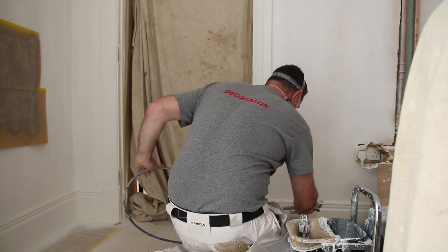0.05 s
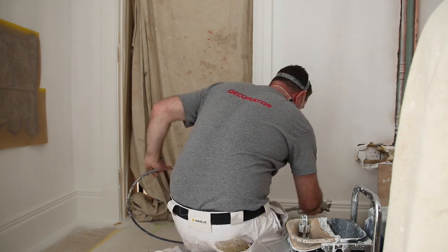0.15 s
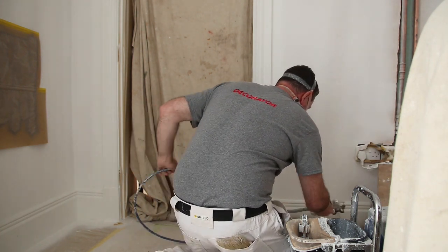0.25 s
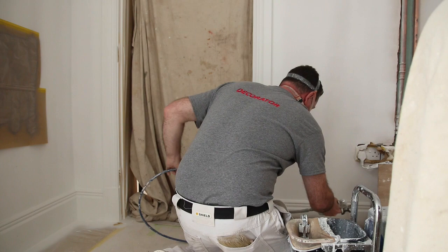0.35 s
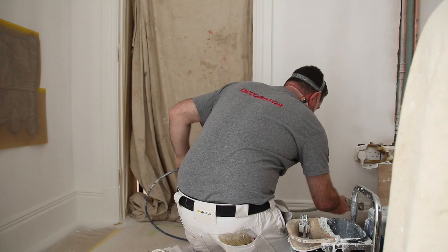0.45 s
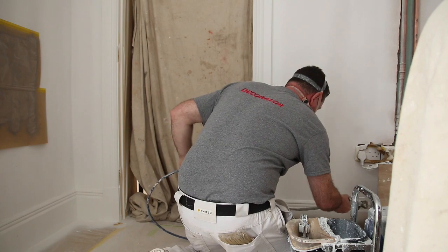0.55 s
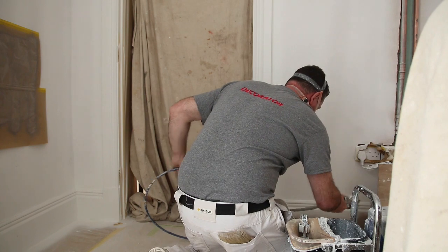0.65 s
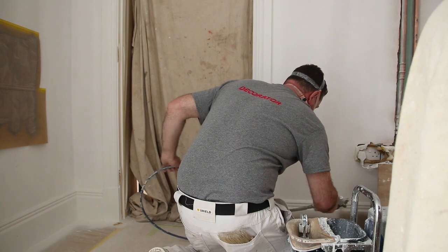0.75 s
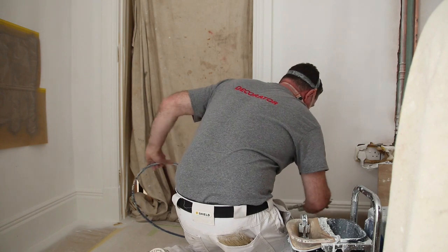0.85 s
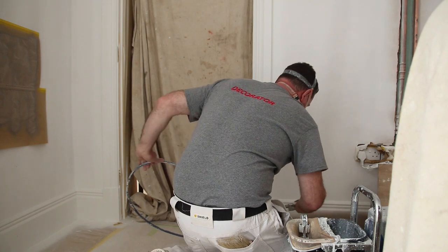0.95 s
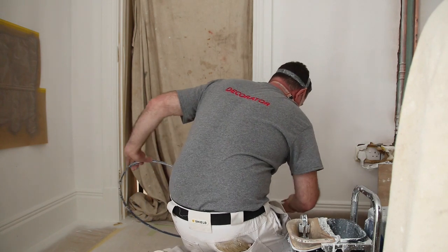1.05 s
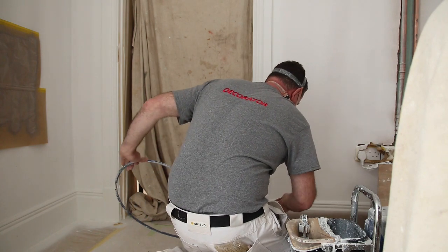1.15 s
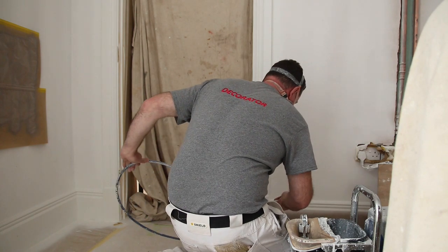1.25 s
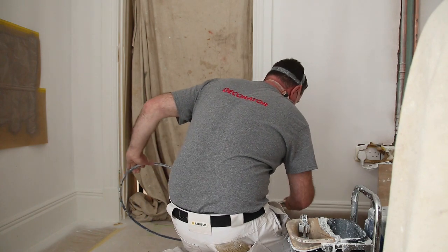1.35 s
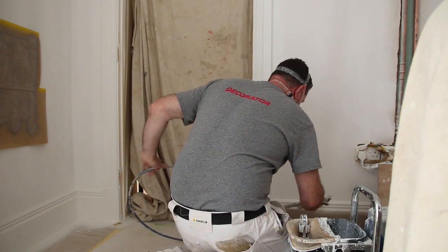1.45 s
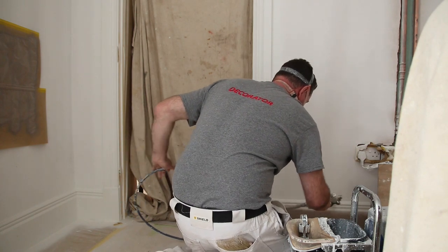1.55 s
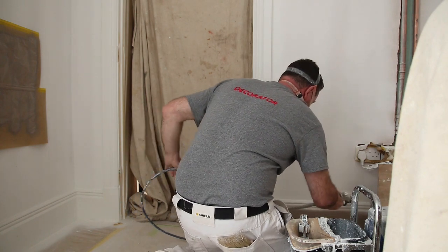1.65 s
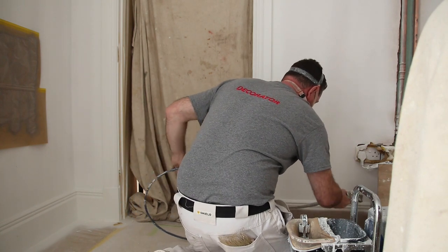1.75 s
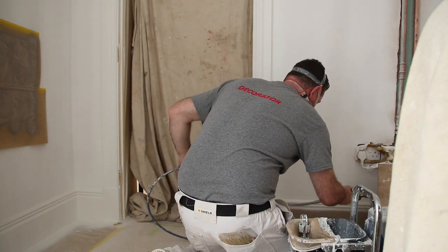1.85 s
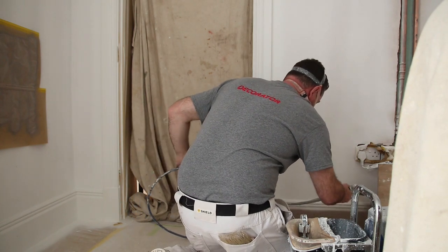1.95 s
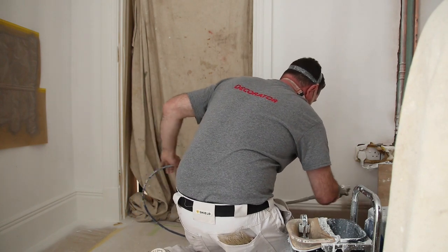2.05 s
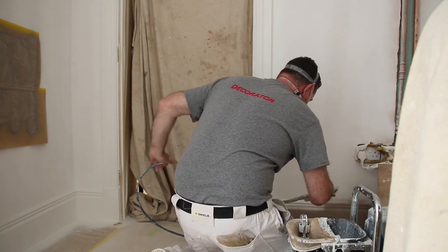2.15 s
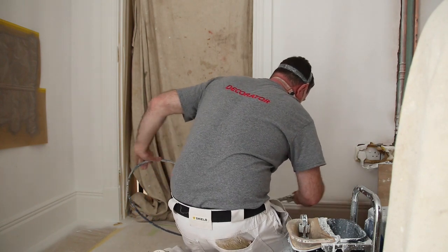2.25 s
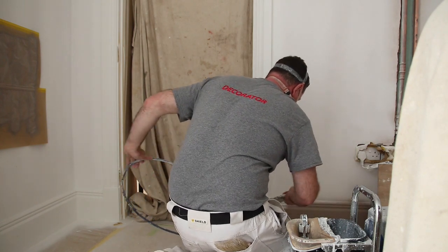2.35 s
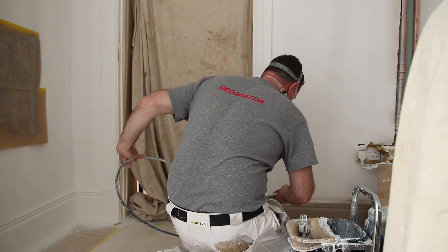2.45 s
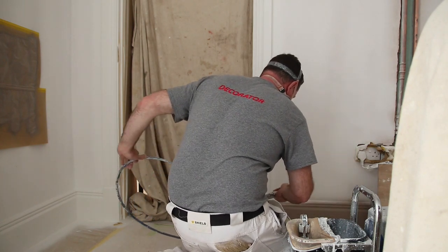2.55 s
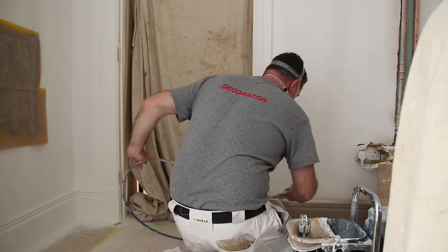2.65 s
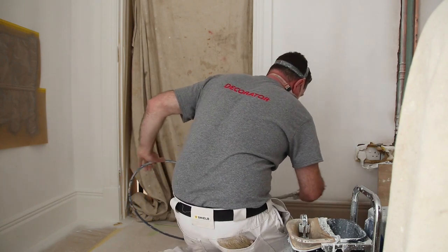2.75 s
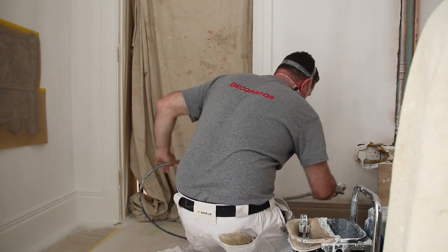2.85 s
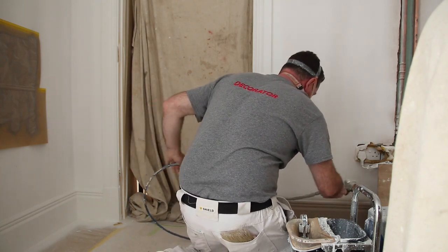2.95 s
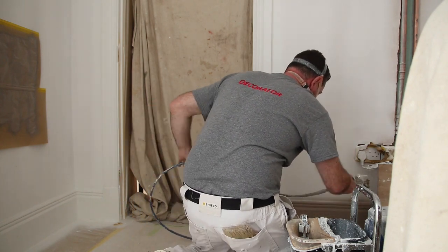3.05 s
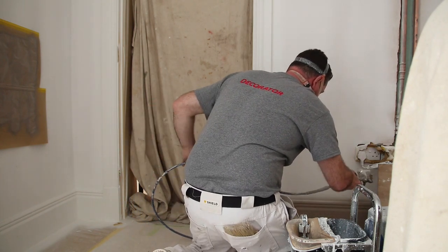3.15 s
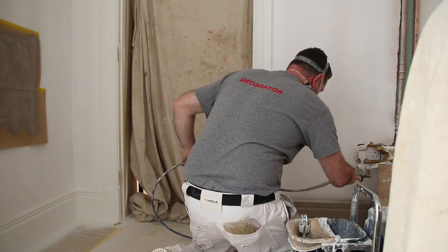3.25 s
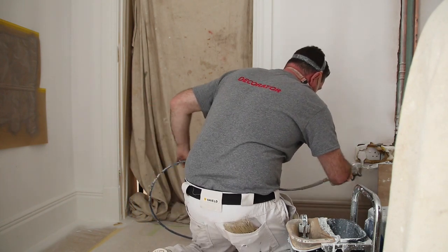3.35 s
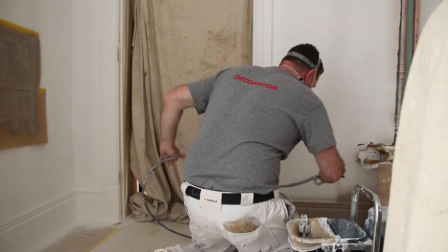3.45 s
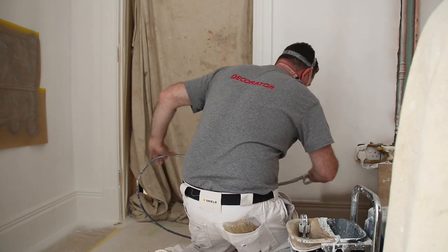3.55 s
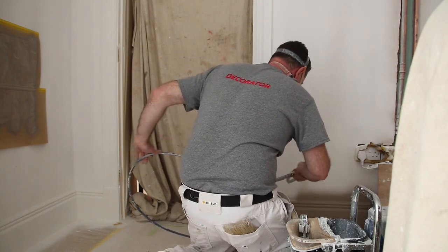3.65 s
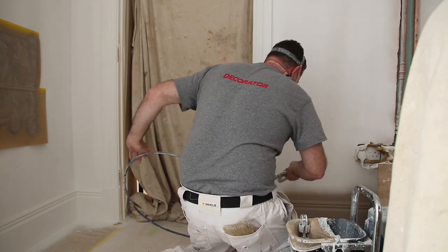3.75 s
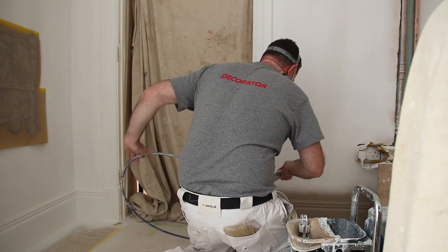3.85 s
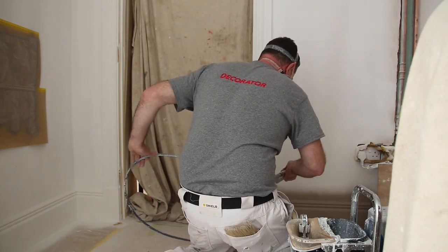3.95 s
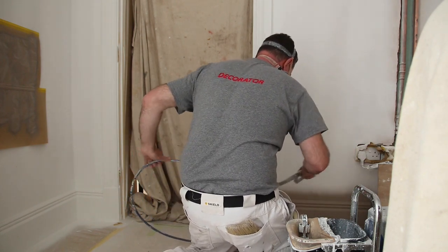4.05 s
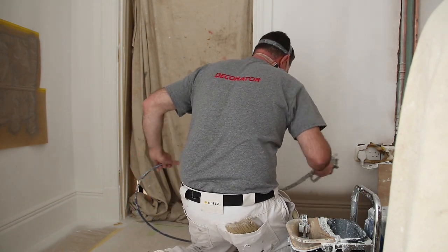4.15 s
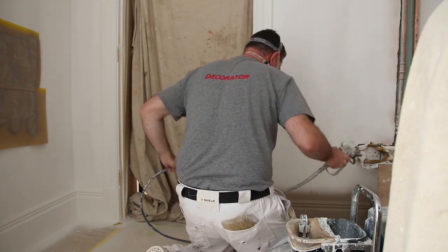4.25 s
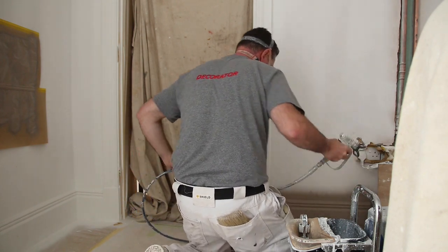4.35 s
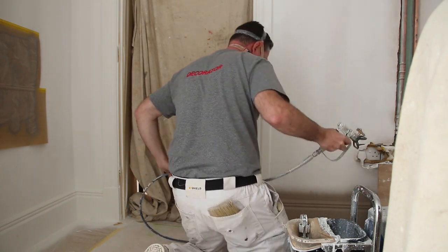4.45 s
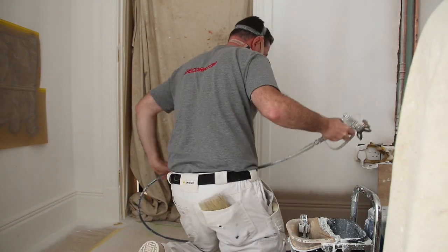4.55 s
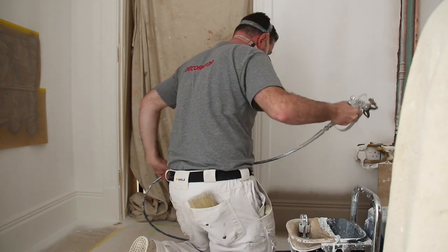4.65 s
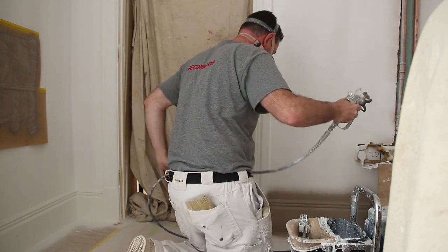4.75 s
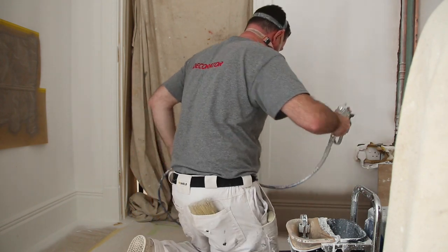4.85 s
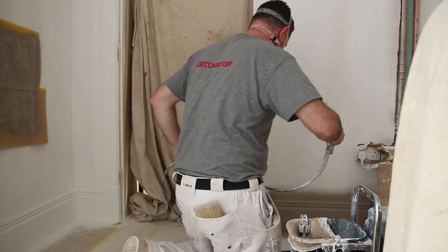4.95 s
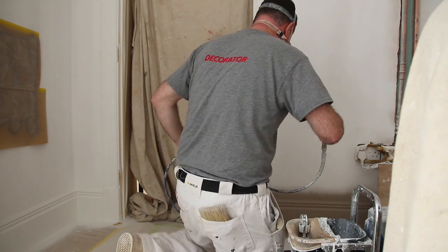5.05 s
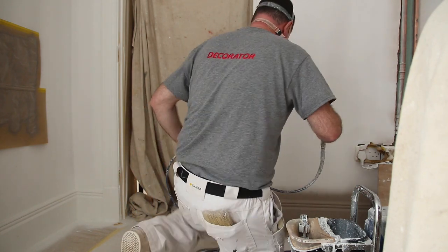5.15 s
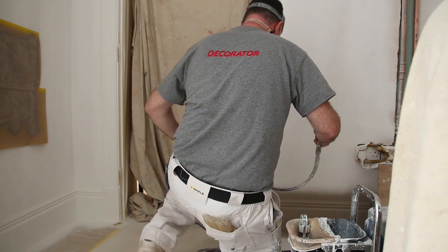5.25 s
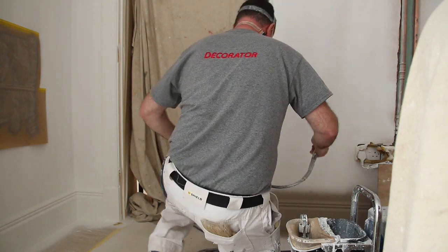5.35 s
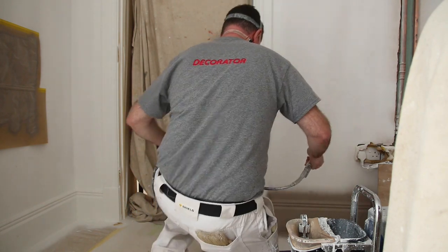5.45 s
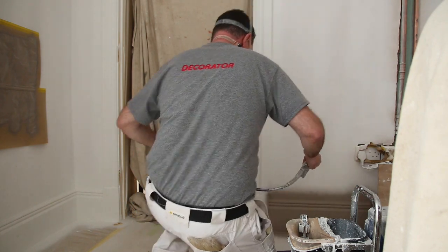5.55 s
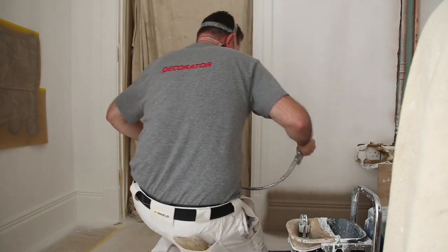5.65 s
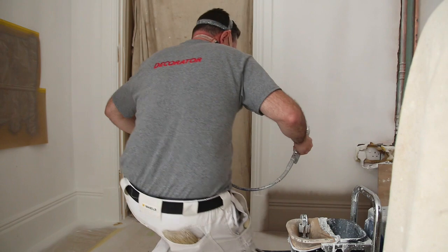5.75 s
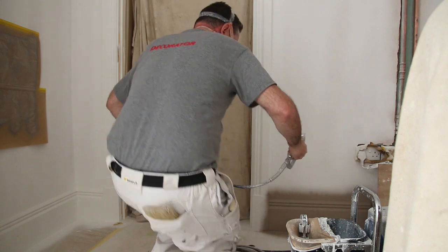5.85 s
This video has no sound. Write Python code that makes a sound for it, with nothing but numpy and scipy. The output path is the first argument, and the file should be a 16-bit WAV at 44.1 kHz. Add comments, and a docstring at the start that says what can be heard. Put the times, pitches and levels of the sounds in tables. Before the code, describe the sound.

Close-sounding stereo of an airless sprayer at work: smooth airy jets start sharply, stop and restart six times, over a droning motor with a nasal whine, rough gear chatter, piston knocks and short groans. Just before four seconds the spraying ends. The whine slowly sinks over low floorboard rumble while the painter shifts, clothing rustling, with soft thumps and a brief hard rattle. Short reverberation of a bare room.

```python
"""A broad bright hiss over a droning motor: six passes of an airless spray gun along skirting trim, in a small
bare room, heard on a widened microphone pair. The jet is shaped noise, dulled as the wrist turns. The pump's gear
contacts, piston knocks and short groans are random contacts and noise puffs ringing housing modes; the windings
hum in sine tones, the drone and whine are ringing noise. After the last pass the motor fades under a rumble of
the boards, cloth swishes, soft low thumps and one rattling bump."""
import sys
import numpy as np
from scipy import signal
from scipy.fft import rfft, irfft, next_fast_len
from scipy.io import wavfile
from scipy.ndimage import uniform_filter1d

SR = 44100
rng = np.random.default_rng(int(sys.argv[2]) if len(sys.argv) > 2 else 0)


def digitize_waveform(pressure):
    """Quantize a signal to 16-bit integers and store it at the path in sys.argv[1].

    Rows of a 2-D input are taken as channels; values are limited to [-1, 1].
    """
    field = np.atleast_2d(pressure).T
    bounded = np.clip(field, -1, 1)
    quanta = np.round(bounded * 32767).astype(np.int16)
    wavfile.write(sys.argv[1], SR, quanta)


N = 259749
TIME = np.arange(N) / SR
COARSE = 32   # event levels are computed once every this many samples
ROOM_T60_S, ROOM_DB = 0.53, -3.5   # reverberation behind gears, knocks, groans, swishes and thumps


def from_db(db):
    """Gain of a dB value."""
    return 10 ** (np.asarray(db) / 20)


def rms_one(x):
    """Scaled to rms 1."""
    return x / np.sqrt(np.mean(x ** 2) + 1e-20)


def noise():
    """White noise for mid and side, unrelated to each other."""
    return rng.standard_normal((2, N))


def shape(x, points):
    """Colours x by a (Hz, dB) curve, straight over log frequency."""
    hz, db = np.transpose(points)
    size = next_fast_len(N)
    grid = np.maximum(np.fft.rfftfreq(size, 1 / SR), 1)
    curve_db = np.interp(np.log(grid), np.log(hz), db)
    return irfft(rfft(x, size) * from_db(curve_db), size)[..., :N]


def drift(rate):
    """Slow random wander up to about rate Hz, rms 1."""
    pole = np.exp(-80 * np.pi * rate / SR)   # runs on every 40th sample
    chance = rng.standard_normal(N // 40 + 2002)
    slow = signal.lfilter([1], [1, -2 * pole, pole * pole], chance)[2000:]   # settled part only
    return np.interp(np.arange(N) / 40, np.arange(len(slow)), rms_one(slow))


def resonate(x, hz, width):
    """One resonance, width in Hz, gain about 1 on top."""
    r = np.exp(-np.pi * width / SR)
    feedback = [1, -2 * r * np.cos(2 * np.pi * hz / SR), r * r]
    return signal.lfilter(np.array([1, 0, -1]) * (1 - r * r) / 2, feedback, x)


def tilted(x, tilt_db, pivot_hz, flicker_db, rate):
    """Overlapping octave bands, each weighted by a moving slope (dB per octave) and its own flicker."""
    size = next_fast_len(N)
    out, spectrum = 0, rfft(x, size)
    octave = np.log2(np.maximum(np.fft.rfftfreq(size, 1 / SR), 1) / pivot_hz)
    for centre in range(-5, 4):
        share = np.cos(np.pi / 2 * np.clip(octave - centre, -1, 1)) ** 2
        band = irfft(spectrum * share, size)[:, :N]
        out = out + band * from_db(tilt_db * centre + flicker_db * drift(rate))
    return out


def lingering(gain, t60, level_db):
    """Gain of a noisy source's reverberation: its power, smeared by an exponential decay."""
    r = from_db(-120 / (t60 * SR))   # power falls 60 dB in t60 seconds
    return from_db(level_db) * np.sqrt(signal.lfilter([1 - r], [1, -r], gain ** 2))


def swell_db(s, hold, db, rise, fall):
    """Level of each event over time: straight rise in dB, hold, straight fall; one row per event."""
    s, hold, db, rise, fall = (np.reshape(v, (-1, 1)) for v in (s, hold, db, rise, fall))
    since = TIME[::COARSE] - s
    return db - rise * np.maximum(-since, 0) - fall * np.maximum(since - hold, 0)


def summed(rows_db):
    """Gain of events whose powers add, brought back to every sample."""
    gain = np.sqrt(np.sum(from_db(rows_db) ** 2, axis=0))
    return np.interp(np.arange(N), np.arange(0, N, COARSE), gain)


def ringing_air(points, rings):
    """Coloured noise with resonances that hold a nearly even level; rms 1."""
    waver_db, evenness = 1.6, .4   # evenness: 0 noisy, 1 steady
    smooth_air, ringing_source = noise(), noise()
    rung = 0
    for hz, width, db in rings:
        ring = resonate(resonate(ringing_source, hz, width), hz, width)
        power = uniform_filter1d(ring ** 2, size=int(SR / width / 3)) / np.mean(ring ** 2)
        evened = ring / (power + .05) ** (evenness / 2)
        rung = rung + from_db(db + waver_db * drift(5.4)) * evened
    return rms_one(shape(smooth_air, points) + rung)


# Spray passes along the trim. Each row: trigger pull in seconds, release in seconds, jet level in dB at mid-pass,
# change over the pass in dB, wrist turn at the end in seconds, tilt added by the turn in dB per octave.
SPRAY_PASSES = [(-.1, 0.532, -32, 5, 0.2, -4.5), (0.61, 1.21, -35, 2, 0.04, -1.5),
                (1.274, 1.878, -31, 1.5, 0.046, -8.5), (1.926, 2.534, -35.5, 3.5, 0.048, -4.5),
                (2.589, 3.118, -30, 2, 0.33, -1.5), (3.243, 3.874, -31, 0.5, 0.25, -5.5)]
# Colour of the jet before its tilt. Each row: frequency in Hz, relative level in dB per Hz.
JET_COLOUR = [(40, -60), (150, -22), (400, 4), (1000, -14), (2500, 2), (3500, 1), (5000, 0.5), (7000, 0.54),
              (10000, -3.5), (12500, -12.5), (16000, -16.5)]
JET_RISE_S, JET_FALL_S, JET_TILT_DB = 0.021, 0.15, 1   # tilt per octave
JET_BUILD_S, JET_BUILD_DB = 0.017, -2   # the fan opens weaker
TURN_LOSS = 1   # dB of level lost per dB per octave of dulling
JET_TAIL_T60_S, JET_TAIL_DB = 0.28, -14   # the room's hold on the hiss


def spray():
    """Paint tearing into mist at the tip: smooth bright noise, softer and duller as the wrist turns."""
    gain, tilt_db = np.zeros(N), np.zeros(N)
    for pull, release, db, change_db, turn, dull_db in SPRAY_PASSES:
        opening = (TIME - pull) / JET_RISE_S
        closing = (release - TIME) / JET_FALL_S
        gate = np.clip(np.minimum(opening, closing) + .5, 0, 1)
        fresh = np.exp(-np.maximum(TIME - pull, 0) / JET_BUILD_S)
        turned = dull_db * np.clip(1 - (release - TIME) / turn, 0, 1)
        along = np.clip((TIME - pull) / (release - pull), 0, 1) - .5
        gain += gate * from_db(db + change_db * along + JET_BUILD_DB * fresh + TURN_LOSS * turned)
        tilt_db = np.where(TIME > pull - JET_RISE_S, JET_TILT_DB + turned, tilt_db)
    jet = rms_one(shape(noise(), JET_COLOUR))
    jet = tilted(jet, tilt_db, pivot_hz=6500, flicker_db=.9, rate=10)
    return np.hypot(gain, lingering(gain, JET_TAIL_T60_S, JET_TAIL_DB)) * jet


# Pump motor runs, also felt through the boards. Each row: switch on in seconds, time under current in seconds,
# hum in dB, hum fall in dB per second, drone in dB, whine in dB, floor rumble in dB.
MOTOR_RUNS = [(-.3, 0.062, -62, 60, -31, -36.5, -58), (.275, 0.12, -39.5, 500, -33, -35, -46.5),
              (1.3, 0.15, -51.5, 62, -37.5, -38.5, -58), (1.745, 0.14, -48.5, 80, -30, -35, -46),
              (2.47, 0.074, -42, 34.5, -36, -42, -45), (2.99, 0.047, -44.5, 40.5, -34.5, -37.5, -44),
              (3.61, 0.081, -44, 97, -29.5, -37, -43)]
# Faint hums in the quiet. Each row: start in seconds, length in seconds, frequency in Hz, level in dB.
QUIET_HUMS = [(4.388, 1, 104, -61.5), (5.047, 0.32, 102, -64), (5.332, 0.24, 199, -54)]
# Thin tones of the coasting rotor. Each row: start in seconds, hold in seconds, pitch at the start in Hz, level in dB.
SINKING_TONES = [(.9, .17, 1240, -44.5), (4.125, 0.13, 1200, -46)]
# Colour of the drone before its rings. Each row: frequency in Hz, relative level in dB per Hz.
DRONE_COLOUR = [(25, -107), (60, -60), (100, -21), (150, -10.5), (200, -2.5), (320, -1.5), (450, -8.5),
                (700, -5.5), (1000, -21), (2000, -71.5)]
# Motor frame resonances. Each row: frequency in Hz, width of each of two filters in Hz, drive in dB.
FRAME_RINGS = [(160, 22, -8), (201, 22, -4), (228, 30, 1), (257, 26, 10), (295, 40, -1)]
# Colour of the fan's whine before its rings. Each row: frequency in Hz, relative level in dB per Hz.
WHINE_COLOUR = [(50, -55), (130, -25), (500, -22), (800, -9), (1000, -8), (1250, -6), (1450, -8),
                (1850, -7), (2200, -11), (3500, -20), (5000, -26.5), (9000, -31.5), (11000, -67.5),
                (16000, -90)]
# Fan shroud resonances. Each row: frequency in Hz, width of each of two filters in Hz, drive in dB.
SHROUD_RINGS = [(620, 50, -9), (1230, 110, -4), (1370, 70, -9), (1640, 85, 4.5), (1705, 60, -3),
                (1860, 45, -4), (2040, 90, -9)]
HUM_HZ, HUM_RISE = 99.8, 540   # rise in dB per s
BUZZ_HZ, BUZZ_OVER_HUM_DB, BUZZ_FALL = 297, 2.2, 220   # windings under current; fall in dB per s
SPIN_UP, DRONE_FALL, WHINE_FALL = 150, 10.63, 4.24   # dB per s
FAINT_HUM_FADE, COAST_FADE = 120, 200   # dB per s, in and out
COAST_SAG_HZ_PER_S = 850


def rotor():
    """Winding hum, low drone and fan whine: levels climb in each run, then fall slowly as the rotor coasts."""
    on, length, hum_db, hum_fall, drone_db, whine_db, _ = np.transpose(MOTOR_RUNS)
    turn = 2 * np.pi * TIME
    hum_gain = summed(swell_db(on, length, hum_db, HUM_RISE, hum_fall))
    tones = hum_gain * np.sin(HUM_HZ * turn)
    buzz_gain = summed(swell_db(on, length, hum_db + BUZZ_OVER_HUM_DB, HUM_RISE, BUZZ_FALL))
    tones += buzz_gain * np.sin(BUZZ_HZ * turn + 1.1 * drift(8.0))   # unsteady phase
    for s, hold, hz, db in QUIET_HUMS:
        tones += summed(swell_db(s, hold, db, FAINT_HUM_FADE, FAINT_HUM_FADE)) * np.sin(hz * turn)
    for s, hold, hz, db in SINKING_TONES:
        since = TIME - s
        cycles = since * (hz - COAST_SAG_HZ_PER_S * since / 2)
        tones += summed(swell_db(s, hold, db, COAST_FADE, COAST_FADE)) * np.sin(2 * np.pi * cycles)
    # where runs overlap, only the loudest counts
    drone_gain = summed([swell_db(on + length, 0, drone_db, SPIN_UP, DRONE_FALL).max(axis=0)])
    whine_gain = summed([swell_db(on + length, 0, whine_db, SPIN_UP, WHINE_FALL).max(axis=0)])
    drone = ringing_air(DRONE_COLOUR, FRAME_RINGS) * drone_gain * from_db(0.8 * drift(12.5))
    whine = ringing_air(WHINE_COLOUR, SHROUD_RINGS) * whine_gain * from_db(0.34 * drift(19.0))
    return np.sqrt(2) * tones + drone + whine   # root 2: the tones' dB are rms


# Floorboards under the pump and the painter's knees. Each row: frequency in Hz, relative level in dB per Hz.
BOARD_COLOUR = [(20, -8), (70, 8.5), (150, 12.5), (300, 4), (1000, -34)]
RUMBLE_RISE, RUMBLE_FALL, RUMBLE_LAG_S = 220, 33, 0.032   # dB per s, dB per s
SHIFT_AT_S, SHIFT_LENGTH_S, SHIFT_DB = 4.05, 1.9, -54.5   # the painter shifts his weight on the boards


def floor():
    """The boards rumble, as low noise, after each motor start and under the painter."""
    on, length, *_, db = np.transpose(MOTOR_RUNS)
    pump_db = swell_db(on + RUMBLE_LAG_S, length, db, RUMBLE_RISE, RUMBLE_FALL)
    painter_db = swell_db(SHIFT_AT_S, SHIFT_LENGTH_S, SHIFT_DB, RUMBLE_RISE, RUMBLE_FALL)
    return summed(np.vstack([pump_db, painter_db])) * rms_one(shape(noise(), BOARD_COLOUR))


# Piston strokes under load. Each row: start in seconds, hold in seconds, gear grind into the housing in dB,
# rise in dB per second, fall in dB per second, sharpness at the top in dB per octave.
PISTON_STROKES = [(0.307, 0.12, -8.5, 243, 101, 1.55), (0.601, 0.017, -13, 298, 91, 1),
                  (1.352, 0.02, -11, 189, 199, 0), (1.779, 0.1, -8, 450, 65, 2),
                  (2.098, 0.0053, -9.5, 400, 154, -0.5), (2.523, 0.065, -10, 213, 72, -0.5),
                  (3.004, 0.038, -7, 307, 135, 0), (3.64, 0.14, -9, 321, 84, 1.5),
                  (3.904, 0.0084, -12.5, 145, 90, 0)]
# Piston knocks, and short groans near 610 Hz as the slowing gears meet a housing mode. Each row: start in seconds,
# force into the housing in dB, length in seconds, centre in Hz.
KNOCKS_AND_GROANS = [(0.262, -29, 0.034, 640), (0.322, -28, .014, 1750), (0.334, -19.5, 0.017, 1250),
                     (0.343, -25, 0.027, 2610), (0.417, -16, 0.012, 1430), (.42, -22, .016, 2370),
                     (0.462, -17.5, 0.0092, 630), (.463, -16.5, 0.0079, 1780), (.485, -32, 0.024, 624),
                     (0.493, -16.5, 0.024, 1520), (0.536, -21.5, 0.021, 1320), (0.573, -26.5, 0.015, 920),
                     (0.619, -17, 0.012, 1520), (0.644, -28.5, 0.019, 620), (0.764, -36.5, 0.0092, 655),
                     (1.337, -20, 0.011, 650), (1.365, -23.5, 0.015, 880), (1.774, -17.5, 0.022, 1280),
                     (1.777, -30, 0.02, 2100), (1.824, -19, 0.022, 810), (1.866, -16, 0.023, 1550),
                     (1.894, -24, .014, 2480), (1.905, -15, 0.015, 606), (1.934, -26, 0.025, 605),
                     (1.956, -18.5, 0.016, 1610), (2.043, -22.5, 0.0067, 690), (2.096, -15.5, 0.015, 1380),
                     (2.52, -23.5, 0.029, 1160), (2.586, -21, 0.015, 580), (2.59, -24, 0.018, 2000),
                     (3.002, -13, 0.0047, 1050), (3.008, -13.5, 0.0051, 860), (3.003, -24, 0.011, 2200),
                     (3.02, -23, 0.0063, 870), (3.043, -14.5, 0.0093, 1350), (3.071, -22.5, 0.0062, 630),
                     (3.144, -26, 0.0084, 1660), (3.644, -20.5, 0.016, 1800), (3.649, -19.5, 0.015, 1250),
                     (3.672, -17, 0.012, 1060), (3.732, -18, 0.019, 1820), (3.754, -24, 0.021, 2450),
                     (3.762, -18, 0.02, 650), (3.783, -17.5, .022, 620), (3.808, -17.5, 0.0093, 1760),
                     (3.875, -18.5, 0.021, 1380), (3.899, -21.5, 0.021, 910), (3.917, -13, 0.01, 1580),
                     (3.919, -32.5, 0.02, 3660), (3.944, -19, 0.014, 865), (4.088, -37, 0.0096, 625)]
# Pump housing modes. Each row: frequency in Hz, width in Hz, relative level in dB.
HOUSING_MODES = [(253, 51, -9), (292, 47, -5.5), (414, 68, -10.5), (563.6, 20.6, -5.5), (613.7, 16, -0.5),
                 (717, 51, -5), (860, 51, -8), (910.5, 15.7, -1), (980, 54, -11), (1048, 15, -6.5),
                 (1073, 21, -8), (1182, 20, -6), (1279, 27, -5.5), (1367, 35, -4.5), (1608, 52, -11.5),
                 (1751, 42, -4.5), (1803, 102, -6), (1859.5, 98, -5.5), (2020, 21, -11), (2098, 20, -13),
                 (2305, 78, -16.5), (2465, 28, -14), (2727, 260, -24), (3550, 780, -30.5)]
DULLING_RISING, DULLING_FALLING = 0.75, 0.32   # dB per octave for each dB below the stroke's top
MAINS_THROB = 0.24   # share by which the gear load pulses with the hum
PUFF_SPREAD = 0.42   # width over centre, each of two filters
DIRECT_DB = -15.5   # part of each knock or groan heard straight, past the housing modes
CASING_DB, CASING_LOW_HZ = 10.5, 127   # how strongly it radiates; too small for deep bass


def gear_teeth(gain):
    """Uneven contacts at random moments, pulsing with the hum, with a diffuse noise tail from the room."""
    sizes = from_db(1.63 * np.minimum(rng.exponential(1, (2, N)), 5)) * rng.choice([-1, 1], (2, N))
    contacts = rms_one(sizes * (rng.random((2, N)) < 1500 / SR))   # about 1500 per second
    throb = 1 + MAINS_THROB * np.sin(2 * np.pi * HUM_HZ * TIME)
    grind = contacts * gain * throb * from_db(1.5 * drift(28))
    return grind + noise() * lingering(gain, ROOM_T60_S, ROOM_DB)


def knocks_and_groans():
    """Each knock or groan is a softly swelling puff of band noise that lingers in the room."""
    puffs = np.zeros((2, N))
    step = np.arange(round(.35 * SR))
    for s, db, length, hz in KNOCKS_AND_GROANS:
        swell = np.sqrt(np.abs(np.sin(np.pi * np.clip(step / SR / length, 0, 1))))
        puff = rng.standard_normal((2, len(step)))
        for _ in range(2):
            puff = resonate(puff, hz, PUFF_SPREAD * hz)
        power = np.sum((puff * swell) ** 2, axis=1, keepdims=True) / np.sum(swell ** 2)
        puff = puff / np.sqrt(power)   # each lands with its full force
        puffs[:, round(s * SR) + step] += from_db(db) * puff * np.hypot(swell, lingering(swell, ROOM_T60_S, ROOM_DB))
    return puffs


def pump():
    """Gear contacts, knocks and groans shake the housing modes, duller whenever a stroke is below its top."""
    s, hold, top_db, rise, fall, sharp_db = np.transpose(PISTON_STROKES)
    rows_db = swell_db(s, hold, top_db, rise, fall)
    loudest = rows_db.argmax(axis=0)
    dulling = np.where(TIME[::COARSE] < s[loudest], DULLING_RISING, DULLING_FALLING)
    below_top_db = rows_db.max(axis=0) - top_db[loudest]
    tilt_db = np.repeat(sharp_db[loudest] + dulling * below_top_db, COARSE)[:N]
    puffs = knocks_and_groans()
    drive = gear_teeth(summed(rows_db)) + puffs
    body = from_db(DIRECT_DB) * puffs
    for k, (hz, width, db) in enumerate(HOUSING_MODES):
        body = body + (-1) ** k * from_db(db) * resonate(drive, hz, width)   # neighbours in opposite phase
    body = signal.sosfilt(signal.butter(3, CASING_LOW_HZ, "high", fs=SR, output="sos"), body)
    return from_db(CASING_DB) * tilted(body, np.clip(tilt_db, -2.5, 4), pivot_hz=965, flicker_db=1.07, rate=6.4)


# Cloth swishes and soft low thumps. Each row: start in seconds, rise in seconds, fall in seconds, level in dB,
# low edge in Hz, high edge in Hz.
SWISHES_AND_THUMPS = [(4.39, 0.045, 0.065, -38.5, 990, 3250), (4.43, 0.03, 0.04, -52, 2200, 5500),
                      (4.85, 0.0087, 0.032, -49.5, 2200, 4000), (4.96, 0.0056, 0.058, -36.5, 118, 256),
                      (5.106, 0.004, 0.044, -43.5, 1200, 2800), (5.145, 0.012, 0.03, -46, 1300, 2800),
                      (5.2, .1, .12, -51, 181, 340), (5.42, 0.024, 0.049, -49, 203, 293),
                      (5.33, 0.006, 0.05, -50, 2000, 6000), (5.345, 0.02, 0.05, -45, 1400, 3200),
                      (5.41, 0.015, 0.025, -52, 1500, 4460), (5.55, 0.0017, 0.025, -58, 2000, 4470),
                      (5.575, .004, 0.0055, -59.5, 2960, 6950), (5.655, 0.013, 0.017, -44, 400, 800),
                      (5.64, 0.025, 0.03, -46, 1100, 4200), (5.685, 0.0077, 0.015, -47, 1200, 3000),
                      (5.84, 0.015, 0.037, -56, 2030, 4400)]


def swishes_and_thumps():
    """Cloth swishes in high bands and soft thumps in low ones: flickering noise with the room behind it."""
    out = 0
    grain = rms_one(noise() * from_db(1.8 * drift(150)))
    for s, rise, fall, db, low_hz, high_hz in SWISHES_AND_THUMPS:
        swell = np.clip((TIME - s) / rise, 0, 1) * np.exp(-np.maximum(TIME - s - rise, 0) / fall)
        swell = np.hypot(swell, lingering(swell, ROOM_T60_S, ROOM_DB))
        band = signal.sosfilt(signal.butter(2, [low_hz, high_hz], "band", fs=SR, output="sos"), grain)
        soft = rms_one(signal.lfilter([1], [1, -.6], band))   # dull on top
        out = out + from_db(db) * swell * soft
    return out


# The gun rattles against something hard. Each row: contact in seconds, strength in dB.
GUN_CONTACTS = [(5.108, -33.5), (5.111, -32.5), (5.116, -36), (5.12, -35.5), (5.123, -37), (5.127, -40),
                (5.158, -39)]
# Modes of the gun body. Each row: frequency in Hz, width in Hz, relative level in dB.
GUN_MODES = [(1310, 100, -11), (1680, 110, -5), (2030, 80, -4), (2230, 91, -8), (2500, 120, -8),
             (3100, 300, -22)]
GUN_SOFT_HZ = 3500   # the contacts are soft


def bump():
    """A few quick contacts set the gun body ringing briefly, each mode by a chance amount."""
    s, db = np.transpose(GUN_CONTACTS)
    out = 0
    for hz, width, mode_db in GUN_MODES:
        luck_db = rng.normal(0, 2.0, (2, len(s)))
        clicks = np.full((2, N), 1e-18)   # not quite zero, so the filter never slows down
        # divided by the width: broad and narrow modes carry their level alike
        clicks[:, (s * SR).astype(int)] = from_db(db + mode_db + luck_db) * SR / (2 * np.pi * width)
        out = out + resonate(clicks, hz, width)
    return signal.sosfilt(signal.butter(4, GUN_SOFT_HZ, fs=SR, output="sos"), out)


# Widened microphone pair. Each row: frequency in Hz, side minus mid in dB.
PAIR_WIDTH = [(25, -8), (60, -9), (125, -24), (250, -21), (500, -18), (1000, -11.5), (2000, -7.5),
              (4000, 3.5), (8000, 6.5), (15000, 9)]


def scene():
    """All sources on the pair: the bass mostly alike in both channels, the treble more in opposition."""
    mid, side = spray() + rotor() + floor() + pump() + swishes_and_thumps() + bump()
    side = shape(side, PAIR_WIDTH)
    return np.array([mid + side, mid - side])


def record(dry):
    """The top is cut steeply: 70 dB down from 15.9 kHz."""
    return signal.sosfilt(signal.cheby2(12, 70, 15900, fs=SR, output="sos"), dry)


dry = scene()
out = record(dry)
digitize_waveform(out)
```